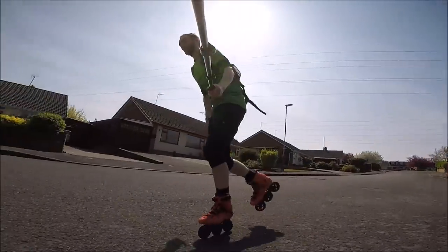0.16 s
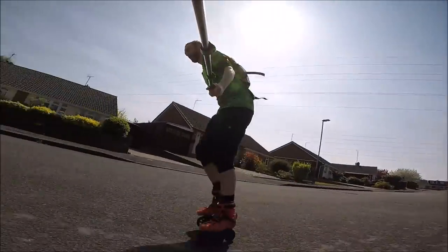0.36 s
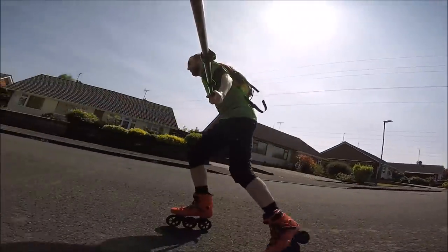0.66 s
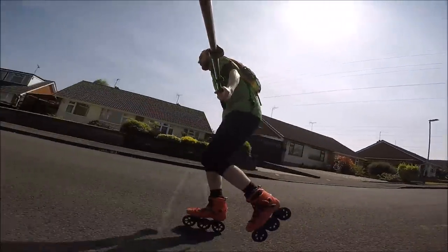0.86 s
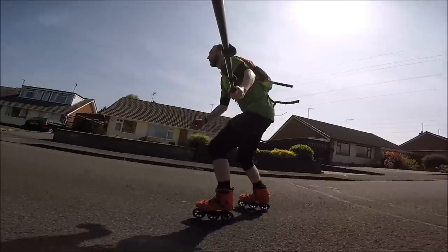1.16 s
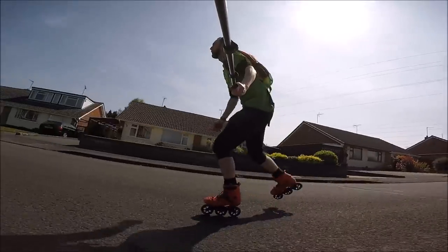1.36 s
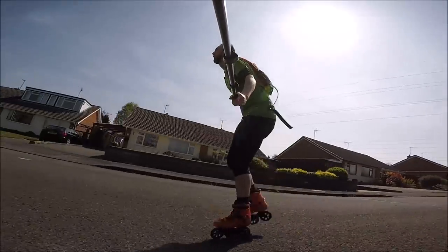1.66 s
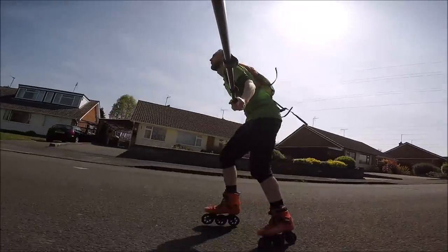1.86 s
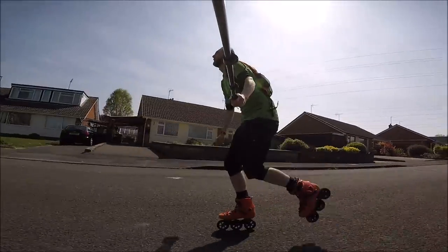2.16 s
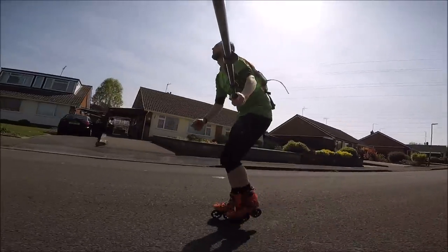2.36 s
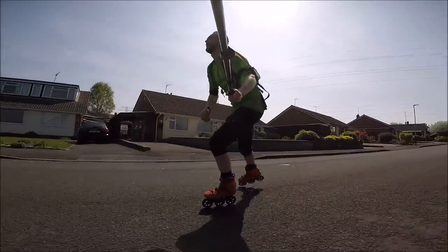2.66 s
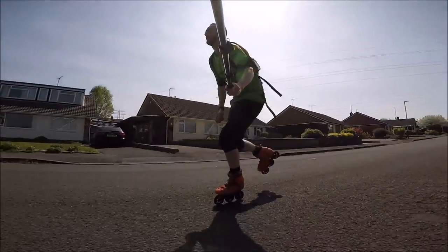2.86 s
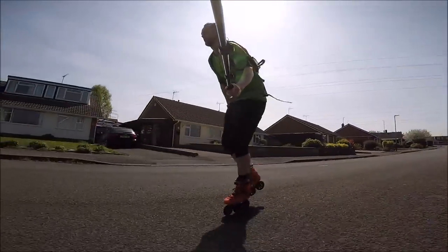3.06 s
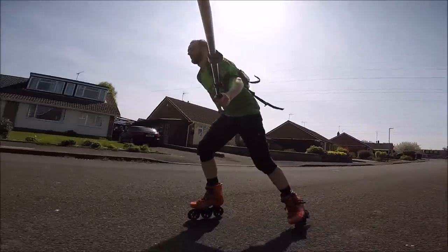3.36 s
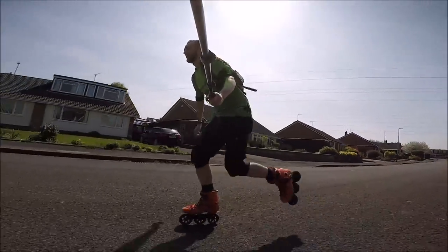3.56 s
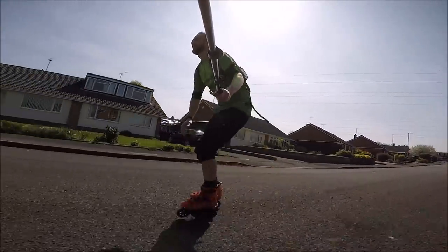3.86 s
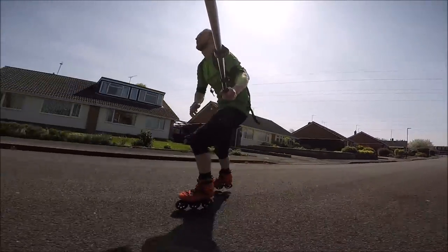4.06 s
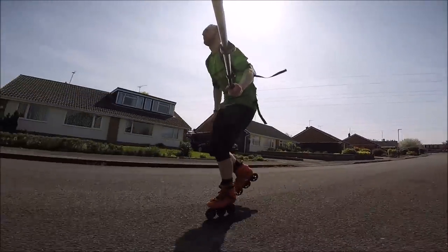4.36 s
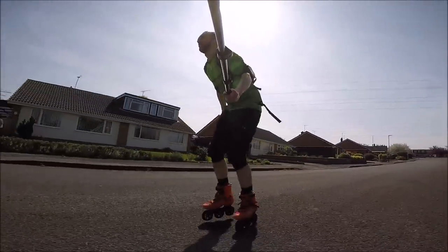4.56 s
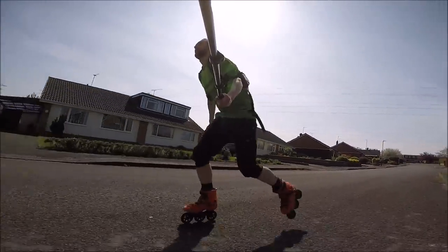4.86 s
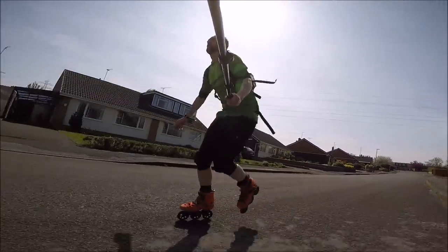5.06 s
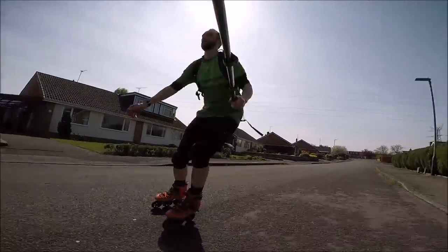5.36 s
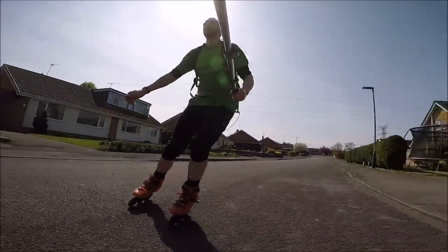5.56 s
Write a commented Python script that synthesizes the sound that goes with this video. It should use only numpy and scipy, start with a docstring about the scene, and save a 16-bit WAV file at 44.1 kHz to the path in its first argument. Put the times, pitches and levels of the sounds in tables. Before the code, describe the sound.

Inline skates stride over rough asphalt with a deep rumble, gritty scrapes and sharp clacks, wind rushing at the start and end.

```python
"""An inline skater strides along a street of rough asphalt, close to a microphone on a hand-held pole in open air.
At the start the pole swings round and wind rushes across the port, over hollow knocks, sharp clacks and snapping grit.
Then the stride carries on: stones drum up a deep rumble and a roar, pushed skates scrape and sizzle, a wheel sings.
At the end the pole swings again and the rush returns; slow eddies of wind buffet the microphone throughout.
Stones are random impulses through shaped spectra; wind is shaped noise; bumps and singing are short tones."""
import sys
import numpy as np
from scipy import signal
from scipy.fft import rfft, irfft
from scipy.io import wavfile
from scipy.ndimage import uniform_filter1d

SR = 44100
rng = np.random.default_rng(int(sys.argv[2]) if len(sys.argv) > 2 else 0)


def store_pcm(level_fs):
    """Save levels as 16-bit WAV."""
    pcm = np.round(np.clip(level_fs, -1, 1) * 32767).astype(np.int16)
    wavfile.write(sys.argv[1], SR, np.atleast_2d(pcm).T)


N = 251811

# Every spectrum table below lists: frequency_hz, density_db (per Hz, relative: body() sets the power).
# Bright ring of a struck frame, for clacks and for pattering loose stones: frequency_hz, density_db
CLACK_RING_SPECTRUM = [(1500, -35), (3100, -17.5), (3800, -1), (4300, -4), (5200, 5.5), (5900, 2),
                       (6450, -4), (7200, -24.5), (9000, -33.5), (14000, -49.5)]


def from_db(db):
    """Decibels to amplitude gain."""
    return 10 ** (np.asarray(db) / 20)


def rms_one(x):
    """Scale to unit power."""
    return x / np.sqrt(np.mean(x ** 2) + 1e-20)


def in_time(rows):
    """Each column of a curve table, interpolated at every sample; the first column is time in seconds."""
    seconds, *columns = np.transpose(rows)
    return [np.interp(np.arange(N) / SR, seconds, column) for column in columns]


def drift(rate_hz):
    """Slow random wander of spread 1: noise through two equal low-pass poles near the given rate."""
    step = 40  # samples between computed points
    pole = np.exp(-2 * np.pi * rate_hz * step / SR)
    settle = 2000  # points dropped while the filter settles
    noise = rng.standard_normal(N // step + settle + 2)
    slow = signal.lfilter([1], [1, -2 * pole, pole * pole], noise)[settle:]
    return np.interp(np.arange(N) / step, np.arange(len(slow)), rms_one(slow))


def steady(x, seconds):
    """A noise with its swells slower than the given time evened out; about unit power."""
    return x / np.sqrt(uniform_filter1d(x ** 2, int(seconds * SR)) + 1e-12)


def swell(start_s, length_s, attack_s, release_s):
    """Rises as a quarter sine from its start, and dies away exponentially once its length is over."""
    age = np.arange(N) / SR - start_s
    rise = np.sin(np.pi / 2 * np.clip(age / attack_s, 0, 1))
    return rise * np.exp(-np.maximum(age - length_s, 0) / release_s)


def together(db, swells):
    """Gain of overlapping swells, each at its own level; their powers add."""
    return np.sqrt(from_db(db) ** 2 @ swells ** 2)


def body(force, spectrum):
    """Pass a force through a causal (minimum-phase) body of the given spectrum and unit power gain."""
    size = 8192
    hz, db = np.transpose(spectrum)
    grid = np.maximum(np.arange(size // 2 + 1) * SR / size, 1)
    gain = from_db(np.interp(np.log(grid), np.log(hz), db))
    gain = gain / np.hypot(1, (grid / hz[-1]) ** 5)  # falls away above the last listed frequency
    cepstrum = irfft(np.log(gain))[:size // 2]  # keeping one side of it makes the response causal
    response = irfft(np.exp(rfft(2 * cepstrum, size)))[:size // 2]
    return signal.fftconvolve(force, response / np.linalg.norm(response))[:N]


def ring(force, hz, width_hz):
    """One resonance, passed twice for steep skirts; unit power."""
    pole = np.exp(-1.5 * np.pi * width_hz / SR)
    b = [1, 0.003, -0.79]  # thins out both ends of the spectrum
    a = [1, -2 * pole * np.cos(2 * np.pi * hz / SR), pole * pole]
    return rms_one(signal.lfilter(b, a, signal.lfilter(b, a, force)))


def gliding_ring(force, hz, width_hz):
    """A resonance whose pitch moves: the force is turned down to 0 Hz, low-passed and turned back; unit power."""
    pole = np.exp(-1.5 * np.pi * width_hz / SR)
    turn = np.exp(2j * np.pi * np.cumsum(hz) / SR)
    slow = signal.lfilter([1], [1, -2 * pole, pole * pole], force / turn)
    return rms_one((slow * turn).real)


def stones(per_s, spread_db):
    """Random small impacts on the stones of the road: many weak, a few strong; unit power."""
    hit = rng.random(N) < per_s / SR
    size = from_db(spread_db * np.minimum(rng.exponential(1, N), 4.5))
    return rms_one(hit * size * rng.choice([-1, 1], N))


def wind(lumpy_db=1.5, flutter_db=-1.0):
    """Large eddies push on the microphone all the time; in gusts small ones tear off at the port."""
    # Gusts as the pole swings round: start_s, rise_s, hold_s, rush_db, whoosh_db, buffet_db, airy_hiss_db
    gust_rows = [(-.1, 0.035, 0.1, -37.5, -36.5, -28, -51), (0.105, 0.031, 0.09, -32, -43.5, -42, -58),
                 (5.207, 0.21, 0.061, -34.5, -56, -22, -89), (5.325, 0.028, 0.02, -33.5, -43, -43, -82),
                 (5.379, 0.0055, .015, -34, -41.5, -41, -80), (5.435, 0.08, 0.23, -35, -39, -24.5, -86),
                 (5.51, 0.016, 0.049, -34.5, -37, -24, -77)]
    # Slow pressure swings: frequency_hz, density_db
    eddy_spectrum = [(8, -15.5), (20, -3.5), (35, -4.5), (55, -10.5), (80, -12.5), (150, -31), (400, -66.5)]
    # Low rush of a gust: frequency_hz, density_db
    rush_spectrum = [(50, -6), (130, -4), (200, 8.5), (360, 11), (500, 4.5), (750, -5.5), (980, -29),
                     (1300, -59), (2000, -32), (3500, -35), (8000, -41.5)]
    # Whoosh of air across the port: frequency_hz, density_db
    whoosh_spectrum = [(250, -15), (450, 5), (700, 3), (1000, 3.5), (1400, -7.5), (2000, -12), (3000, -24),
                       (6000, -23), (8800, -33), (10000, -44.5)]
    # Thin airy hiss: frequency_hz, density_db
    air_spectrum = [(6000, -0.5), (7800, -10), (8900, 0), (9600, -8), (10300, -2), (12000, -8), (14000, -9),
                    (15500, -20)]
    gust_release_s, air_release_s = 0.11, 0.054
    buffet_between_db, buffet_wander_db = -28.5, 1.7

    *_, rush_db, whoosh_db, buffet_db, air_db = np.transpose(gust_rows)
    gusts = np.array([swell(s, rise + hold, rise, gust_release_s) for s, rise, hold, *_ in gust_rows])
    airs = np.array([swell(s, rise + hold, rise, air_release_s) for s, rise, hold, *_ in gust_rows])

    eddies = steady(body(rng.standard_normal(N), eddy_spectrum), 0.17)
    between = from_db(buffet_between_db + buffet_wander_db * drift(4.3))
    buffet = eddies * np.hypot(between, together(buffet_db, gusts))

    clumps = from_db(lumpy_db * np.clip(eddies, -2, 2))  # each large eddy carries a clump of small ones
    rush = steady(body(rng.standard_normal(N) * clumps, rush_spectrum), 0.05)
    rush = rush * together(rush_db, gusts)
    whoosh = steady(body(rng.standard_normal(N) * clumps, whoosh_spectrum), 0.03)
    whoosh = whoosh * together(whoosh_db, gusts) * from_db(flutter_db * drift(70))
    hiss = body(rng.standard_normal(N), air_spectrum) * together(air_db, airs)
    return buffet + rush + whoosh + hiss


def rumble():
    """Coarse stones shake skater and pole with a deep boom, and drum on the hollow boots."""
    # Shaking of the skates, levels before the trims below: time_s, boom_db, boots_db
    roll_curve = [(.05, -27, -32.5), (.25, -32, -36), (0.3, -28.5, -35), (0.41, -34, -36.5),
                  (0.46, -28, -33.5), (.95, -22.5, -32.5), (1.16, -25.5, -35), (1.33, -25, -32),
                  (1.7, -25.5, -30.5), (2.15, -23, -33), (2.6, -25, -34), (2.89, -24.5, -37.5),
                  (3.01, -33, -33), (3.06, -18, -36), (3.12, -44.5, -42), (3.19, -37.5, -45.5),
                  (3.25, -26, -35.5), (3.4, -27.5, -37), (3.48, -38, -38.5), (3.64, -33.5, -38.5),
                  (3.99, -25, -39), (4.42, -28.5, -33), (4.49, -32, -39.5), (4.62, -29, -32.5),
                  (5.09, -34, -39.5), (5.2, -26.5, -38), (5.41, -32, -30.5), (5.71, -19, -31)]
    # Deep boom: frequency_hz, density_db
    boom_spectrum = [(30, -31), (55, -2), (72, -4.5), (100, -2), (122, -6), (160, -15), (260, -41.5),
                     (600, -58)]
    # Hollow boots: frequency_hz, density_db
    boot_spectrum = [(70, -11), (120, -8), (165, -1), (205, -2.5), (260, -8), (320, -11.5), (390, -18.5),
                     (480, -23.5), (650, -35.5), (1500, -58.5)]
    boom_db, boots_db = in_time(roll_curve)
    boom = steady(body(stones(1500, 1.1), boom_spectrum), 0.07)
    boots = steady(body(stones(1100, 2.73), boot_spectrum), 0.067)
    boom = boom * from_db(boom_db + 0.5 + 0.14 * drift(27))
    return boom + boots * from_db(boots_db + 2.0 + 1.0 * drift(7.4))


def bumps():
    """Hollow knocks and booming surges over bumps in the road: each a short tone that swells and dies."""
    # centre_s, peak_db (of the swell), pitch_hz, length_s (from the centre to 1/e)
    bump_rows = [(.135, -31, 920, 0.0032), (.149, -18, 171, 0.005), (.1615, -21, 517, 0.0023),
                 (.164, -10, 210, 0.0031), (0.176, -20, 263, 0.0036), (0.196, -35, 740, 0.0098),
                 (0.223, -26, 370, 0.0062), (0.255, -24, 681, 0.0048), (0.267, -21, 276, 0.0085),
                 (0.304, -23, 119, 0.0053), (.547, -18, 127, 0.0057), (.637, -17.5, 150, 0.0055),
                 (0.849, -21.5, 96, 0.044), (1.16, -19, 53.7, 0.035), (1.434, -14.5, 79.6, 0.014),
                 (1.554, -22, 115, 0.044), (1.708, -18, 119, 0.019), (1.775, -13.5, 159, 0.0049),
                 (1.814, -21, 100, 0.018), (1.905, -26, 272, 0.0097), (1.932, -16, 88, 0.012),
                 (2.025, -15.5, 165, 0.0098), (2.049, -15, 99.5, 0.018), (2.12, -18, 110, 0.026),
                 (2.204, -16, 166, 0.009), (2.337, -19, 92.7, 0.049), (2.382, -18.5, 185, 0.0074),
                 (2.435, -24, 125, 0.016), (2.585, -19.5, 84.6, 0.059), (2.673, -25, 79, 0.023),
                 (2.784, -24.5, 296, 0.0037), (3.936, -16, 125, 0.0027), (4.321, -20, 197, 0.0035),
                 (4.404, -27.5, 368, 0.0041), (4.706, -37, 560, 0.0018)]
    t = np.arange(N) / SR
    out = np.zeros(N)
    for centre_s, db, hz, length_s in bump_rows:
        near = np.abs(t - centre_s) < 0.1
        age = t[near] - centre_s
        tone = np.sin(2 * np.pi * (hz * age + rng.random()))
        out[near] += from_db(db) * np.exp(-(age / length_s) ** 2) * tone
    return out


def singing(wobble_hz=28):
    """A loaded wheel sings faintly now and then: a narrow, unsteady tone that swells, glides and fades."""
    # loudest_s, length_s (between the 1/e points), pitch_hz (when loudest), glide_hz_per_s, level_db
    sing_rows = [(0.601, 0.41, 944, 4, -59), (3.08, 0.29, 977, -650, -56.5), (3.356, 0.16, 914, -400, -54),
                 (3.748, 0.23, 940, 1, -62), (4.346, 0.041, 1032, 5, -51.5), (4.719, 0.32, 986, -3, -60.5)]
    tones = 0
    for loudest_s, length_s, hz, glide, db in sing_rows:
        age = np.arange(N) / SR - loudest_s
        phase = 2 * np.pi * (hz + glide * age / 2) * age
        tones = tones + from_db(db) * np.exp(-(2 * age / length_s) ** 2 + 1j * phase)
    wobble = drift(wobble_hz) + 1j * drift(wobble_hz)  # unsteady in level and phase
    evened = np.sqrt(2 / uniform_filter1d(np.abs(wobble) ** 2, SR // 20))
    return (tones * wobble).real * evened


def ticks(decay_s=0.002, width_hz=1500):
    """A chip of grit snaps out from under a wheel: one very short, dry burst of resonant noise."""
    # start_s, peak_db (before the low-pass), pitch_hz
    chip_rows = [(.2735, -38, 5400), (0.315, -35, 5760), (.379, -38, 5600), (.487, -39, 4840),
                 (.702, -42, 4200), (.802, -44, 5300), (0.971, -41, 3900), (1.144, -39, 4440),
                 (1.568, -41, 5240), (1.687, -41, 3900), (2.304, -44, 5300), (2.337, -41, 5800),
                 (2.647, -45, 4000), (3.241, -45, 4000), (3.623, -40, 4560), (4.149, -45, 4500),
                 (4.582, -50, 3600), (4.873, -43, 4600), (5.097, -47, 3700), (5.157, -45, 3750),
                 (5.188, -42, 3700), (5.249, -46, 3900), (5.572, -38, 3800)]
    t = np.arange(SR // 50) / SR
    out = np.zeros(N + len(t))
    for start_s, db, hz in chip_rows:
        noise = ring(rng.standard_normal(len(t)), hz, width_hz)[::-1]  # reversed: at full strength at once
        burst = noise * np.exp(-t / decay_s)
        first = int(start_s * SR)
        out[first:first + len(t)] += from_db(db) * burst / np.abs(burst).max()
    return signal.sosfilt(signal.butter(4, 7000, fs=SR, output="sos"), out[:N])


def clacks(strike_s=0.00045, crunch_s=0.0041, crunch_db=-11, ring_width_hz=1000, soft_hz=8500):
    """A stone passes under two wheels: two sharp strikes, each in a brief crunch as it is ground into the road."""
    # Strengths before the layer trims below: strike_s, first_db, second_db (relative to the first),
    # body_db (relative to the ring), ring_hz, snap_db (relative to the ring)
    clack_rows = [(.2238, -32.5, -9, -6, 6240, -19), (.3907, -35, -11, -14, 4900, -16),
                  (.4975, -41.5, 5, 3, 4820, -16), (.5445, -36, 0, 0, 5200, -24),
                  (.601, -41.5, -10, 13, 5100, -24), (.6332, -34, -17, 5.5, 4300, -23),
                  (.6945, -38, -9, -6, 4300, -21), (.751, -35, -4, 3, 5350, -20),
                  (.774, -39, -4, 2, 5340, -19), (.8208, -36, -6, -5, 3800, -21),
                  (.9592, -35, -10, -2, 6060, -26), (1.506, -42, -8, -7, 4300, -18),
                  (1.6673, -31.5, -14, -9, 6460, -15), (1.686, -37, 0, -2, 4560, -20),
                  (1.863, -39, -6, 3.5, 4600, -21), (2.195, -34, -2.5, 0.5, 4800, -27),
                  (2.325, -42.5, 5, -3, 5430, -31), (3.359, -43, -1, 2, 5530, -25),
                  (3.5595, -36, -10, -5, 5230, -26), (3.966, -41, -6, -6, 4900, -25),
                  (4.64, -44.5, -6, -5, 5570, -22), (4.7868, -36, 4, -3.5, 4950, -24),
                  (4.8805, -32.5, -9, -10, 5040, -23), (5.0445, -35.5, -2.5, -8, 4700, -24),
                  (5.067, -40.5, -3, -17, 4680, -22)]
    # Dull body: frequency_hz, density_db
    body_spectrum = [(150, 15), (400, 5.5), (900, 8), (1500, 10.5), (2100, 4.5), (3200, 0), (6000, -70)]
    # Snap at the top: frequency_hz, density_db
    snap_spectrum = [(4000, -25), (6500, 0), (8500, 0), (9700, -2), (11500, -11), (13000, -20),
                     (15500, -42)]
    wheel_gap_s = 0.00388  # between the two strikes
    lead = SR // 25
    t = np.arange(-lead, lead) / SR
    force = np.zeros((4, N))  # broad ring, body, snap, tuned ring
    for s, db, second_db, body_db, hz, snap_db in clack_rows:
        shape = 0
        for age, gain in (t, 1), (t - wheel_gap_s, from_db(second_db)):
            strike = np.exp(-(age / strike_s) ** 2)
            crunch = from_db(crunch_db) * np.exp(-np.abs(age) / crunch_s)
            shape = np.hypot(shape, gain * np.maximum(strike, crunch))
        during = slice(int(s * SR) - lead, int(s * SR) + lead)
        levels = from_db(db + np.array([[0], [body_db], [snap_db]]))
        force[:3, during] += levels * shape * rng.choice([-1, 1], (3, len(t)))
        tuned = steady(ring(rng.standard_normal(len(t)), hz, ring_width_hz), 0.0015)
        force[3, during] += from_db(db) * shape * tuned
    frame = signal.sosfilt(signal.butter(4, soft_hz, fs=SR, output="sos"), force[3])
    clack = from_db(-5.0) * body(force[0], CLACK_RING_SPECTRUM) + from_db(-3.5) * frame
    return clack + from_db(1.5) * body(force[1], body_spectrum) + body(force[2], snap_spectrum)


def wheel_roar(roar_db, road):
    """Dense impacts of stones on wheels and boots blur into a roar."""
    # frequency_hz, density_db
    roar_spectrum = [(250, -4.5), (400, 4.5), (550, -0.5), (750, -2.5), (1020, -4), (1230, -7.5),
                     (1480, -7.5), (1750, -13.5), (2100, -16.5), (3050, -28.5), (4000, -28.5), (7000, -38),
                     (12000, -47.5)]
    return body(stones(3000, 1.4), roar_spectrum) * from_db(roar_db + 1.74 + 0.26 * road)


def sideways_scrape(sliding, pushes, wheel_db, wheel_hz, road):
    """Wheels pushed sideways scrape, and ring at another pitch on each stride."""
    # frequency_hz, density_db
    scrape_spectrum = [(700, -7), (1300, -2), (1700, -0.5), (1960, 1), (2250, -5.5), (2600, -5),
                       (3000, -14.5), (3500, -16.5), (4300, -11.5), (6500, -17), (8000, -32), (13000, -49)]
    jolts = stones(3000, 2.0)
    whirr = 0
    for db, hz, push in zip(wheel_db, wheel_hz, pushes):
        whirr = whirr + from_db(db) * push * ring(jolts, hz, 270)
    slip = sliding * body(stones(2200, 1.9), scrape_spectrum)
    slip = slip + whirr * from_db(-2.8 + 0.5 * drift(18))
    return slip * from_db(0.5 + 1.6 * road)


def grit_sizzle(crunching, road, shimmer_db=3.0):
    """Crunched grit sizzles and sets the frame ringing, and loose stones patter densely on the frame."""
    # frequency_hz, density_db
    sizzle_spectrum = [(1500, -11), (3300, -8.5), (3950, -3.5), (4600, 4), (5300, 7.5), (5800, 4),
                       (6150, 4.5), (6500, -1), (7000, -10.5), (7600, -19.5), (9000, -44), (14000, -67.5)]
    # Ring that slides in pitch from stride to stride, before the trim and shimmer below:
    # time_s, pitch_hz, level_db, upper_db (a ring of fixed pitch)
    frame_curve = [(0.2, 5200, -14, -3), (.75, 5300, -4, -9), (.97, 5350, -11, 0), (1.08, 5500, -16, -14),
                   (1.2, 5650, -6, -9), (1.85, 5300, -12, -5), (2.05, 5180, -2, -14), (2.3, 5260, -2, -16),
                   (2.55, 5680, -2, -16), (2.85, 5400, -6, -14), (3.7, 5280, -2, -16), (4.1, 5750, -4, -14),
                   (4.65, 5850, -6, -14), (4.82, 5350, -4, -16), (5.14, 4950, -4, -18),
                   (5.25, 5850, -2, -14), (5.54, 5750, -2, -16), (5.62, 5150, -8, -14)]
    frame_hz, frame_db, upper_db = in_time(frame_curve)
    # the contact point wanders, so each ring comes and goes on its own
    frame = gliding_ring(stones(3600, 3.3), frame_hz, 570) * from_db(frame_db + shimmer_db * drift(25.0))
    upper = ring(stones(3300, 5.4), 6430, 350) * from_db(upper_db + shimmer_db * drift(19.0))
    grit = from_db(-1.0) * body(stones(4000, 3.1), sizzle_spectrum) + from_db(-0.5) * (frame + upper)
    grit = grit + from_db(-11) * body(stones(84, 1.1), CLACK_RING_SPECTRUM)  # about 84 loose stones per second
    return grit * crunching * from_db(-0.2 + 1.36 * road + 0.58 * drift(90))


def fine_hiss(hissing, road):
    """The finest grains hiss under the wheels."""
    # frequency_hz, density_db
    hiss_spectrum = [(4500, -12.5), (6000, 8.5), (6550, 10), (7100, 8), (7700, -3.5), (8400, -0.5),
                     (9600, -6), (10400, -3), (11800, -13.5), (13500, -29.5), (15500, -23)]
    hiss = body(stones(6500, 2.2), hiss_spectrum) * hissing
    return hiss * from_db(-1.5 + 0.51 * road + 0.64 * drift(60))


def wheels():
    """Wheels roar on the road; scrape, grit and hiss swell as a skate is set down or leans into a push."""
    # Roar of the wheels, before its trim: time_s, level_db
    roar_curve = [(0.33, -47), (0.63, -44), (0.66, -43.5), (2.16, -44.5), (2.46, -50), (2.64, -48),
                  (2.88, -50), (3.34, -50), (3.72, -53.5), (4.11, -48), (4.27, -51.5), (4.34, -50.5),
                  (4.46, -51.5), (4.75, -50.5), (4.97, -52), (5.26, -50.5)]
    # Pushes, levels before each layer's trim: start_s, length_s, grit_db, hiss_db, scrape_db,
    # wheel_ring_db (relative to the scrape), wheel_ring_hz
    push_rows = [(-.1, 0.18, -59, -56.5, -50.5, 8.5, 1440), (0.11, 0.13, -57, -53, -55, -1.5, 1520),
                 (0.236, 0.079, -55, -63, -55, -3, 1900), (0.317, 0.32, -53.5, -62, -48.5, -1, 1960),
                 (0.568, .24, -54, -70, -51, 0.5, 1920), (0.915, 0.03, -57, -70, -58, 4, 1960),
                 (1.119, 0.15, -55, -62, -48.5, -5, 1350), (1.32, 0.29, -57.5, -60.5, -54.5, 0, 1540),
                 (1.601, 0.31, -54.5, -59.5, -50, -4.5, 1480), (1.894, 0.32, -64.5, -78, -48.5, -5.5, 1950),
                 (2.28, 0.047, -54, -74, -52, -3.5, 1460), (2.487, 0.31, -58, -67.5, -57, 4, 1100),
                 (3.232, 0.4, -60.5, -69, -62, -5.5, 1490), (3.68, 0.16, -57, -82, -60, -6, 1510),
                 (3.982, 0.19, -58, -67, -58.5, 0, 1330), (4.624, 0.48, -60.5, -66.5, -68, -10, 1910),
                 (5.09, 0.15, -57.5, -65, -63.5, -19, 1900), (5.267, 0.053, -54, -75, -66, -13, 1900),
                 (5.42, 0.12, -53, -61, -61, -4, 1950), (5.5, .2, -63, -72, -51.5, -8, 2000)]
    attack_s, release_s = 0.063, 0.12  # the weight comes onto the skate, then leaves it
    # a skate that only glides, before the same trims; its scrape is relative to the roar
    glide_grit_db, glide_hiss_db, glide_scrape_db = -63, -69, -13

    roar_db, = in_time(roar_curve)
    _, _, grit_db, hiss_db, scrape_db, ring_db, ring_hz = np.transpose(push_rows)
    pushes = np.array([swell(s, length, attack_s, release_s) for s, length, *_ in push_rows])
    crunching = np.hypot(from_db(glide_grit_db), together(grit_db, pushes))
    hissing = np.hypot(from_db(glide_hiss_db), together(hiss_db, pushes))
    sliding = np.hypot(from_db(roar_db + glide_scrape_db), together(scrape_db, pushes))
    road = drift(35)  # coarse and smooth patches pass under the wheels
    scrape = sideways_scrape(sliding, pushes, scrape_db + ring_db, ring_hz, road)
    return wheel_roar(roar_db, road) + scrape + grit_sizzle(crunching, road) + fine_hiss(hissing, road)


def scene():
    """Wind and skates at one microphone in the open air."""
    return (wind() + rumble() + bumps() + singing() + ticks() + clacks() + wheels())[None]


def record(dry):
    """Soft ends of 150 samples; the top is cut steeply above 15400 Hz."""
    from_start = np.arange(N)
    ends = np.minimum(np.minimum(from_start, from_start[::-1]) / 150, 1)
    top_cut = signal.ellip(10, 0.1, 80, 15400, fs=SR, output="sos")
    return signal.sosfilt(top_cut, dry * ends)


dry = scene()
out = record(dry)
store_pcm(out)
```